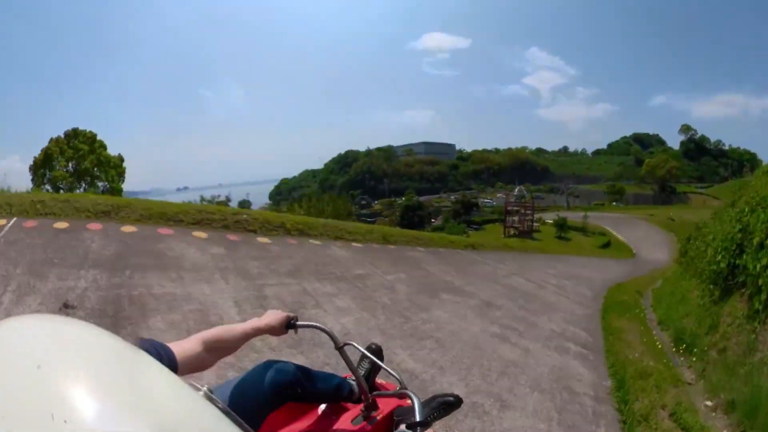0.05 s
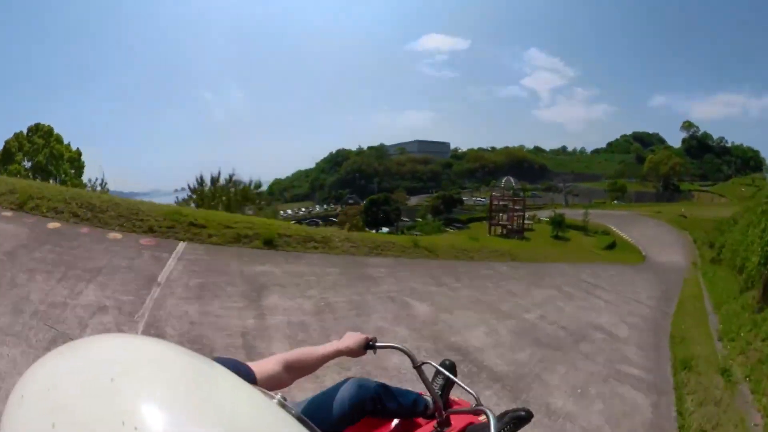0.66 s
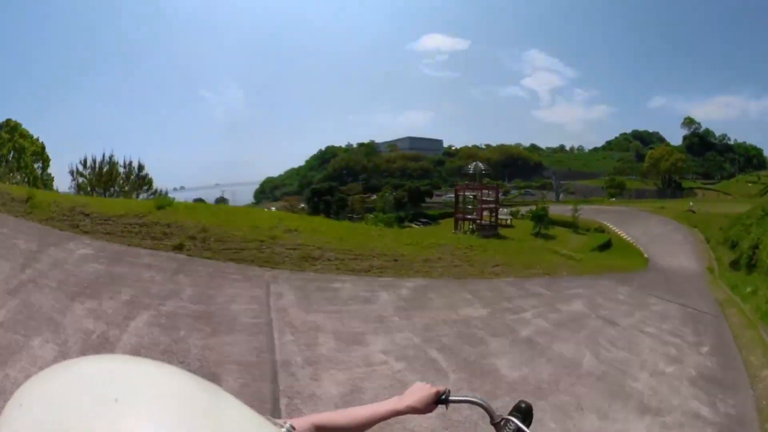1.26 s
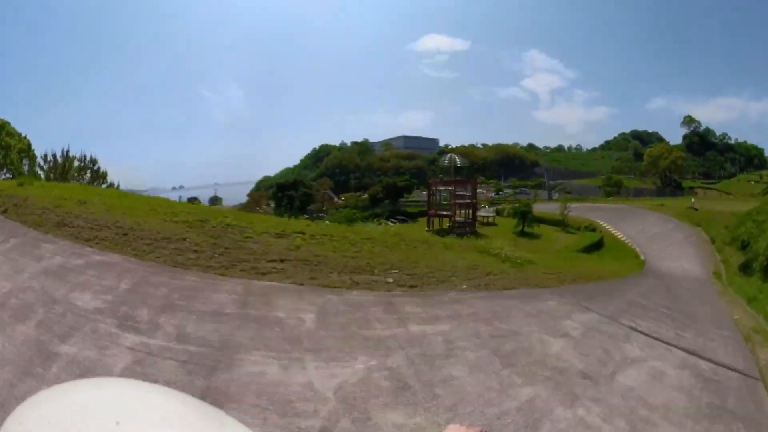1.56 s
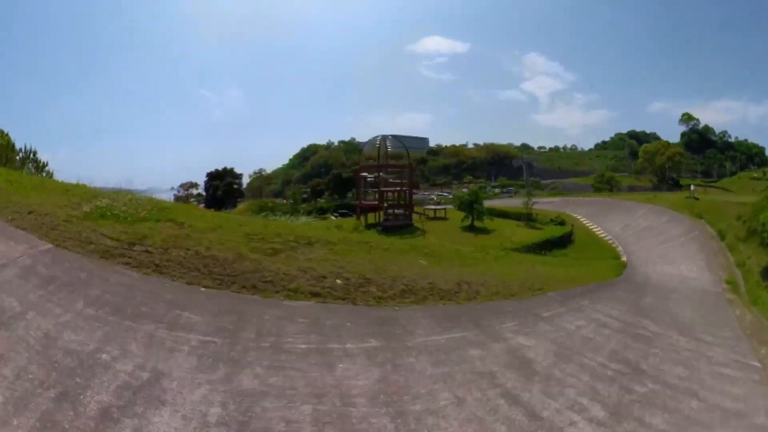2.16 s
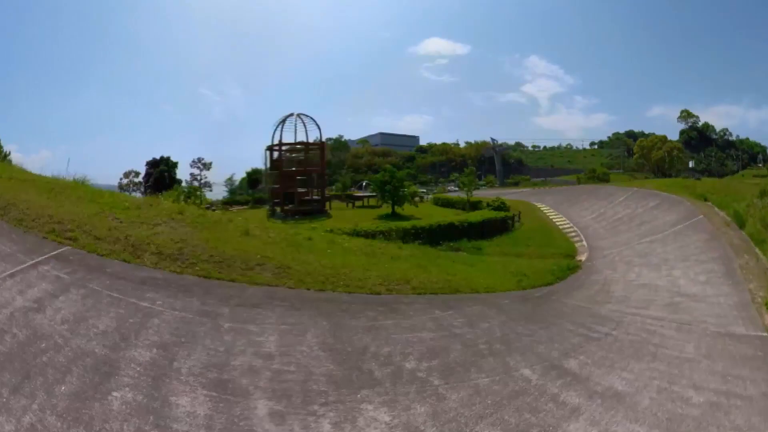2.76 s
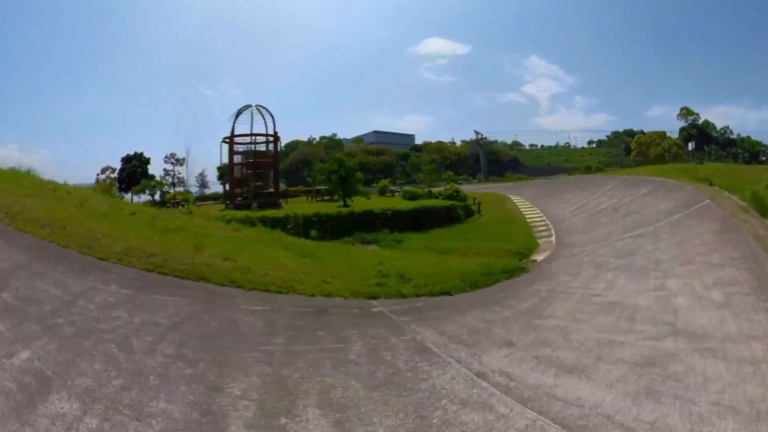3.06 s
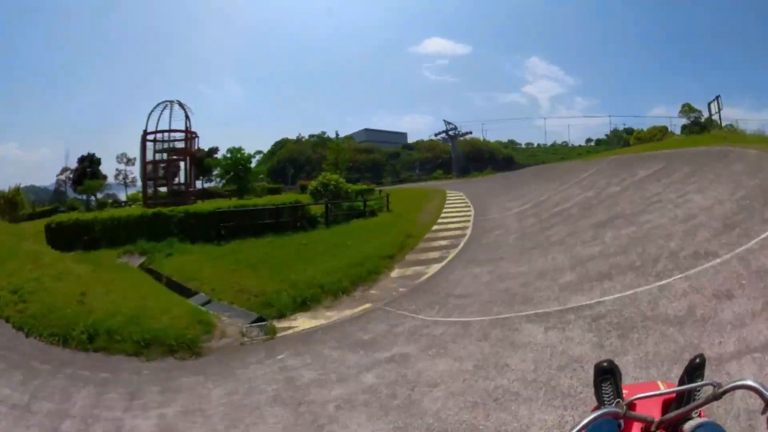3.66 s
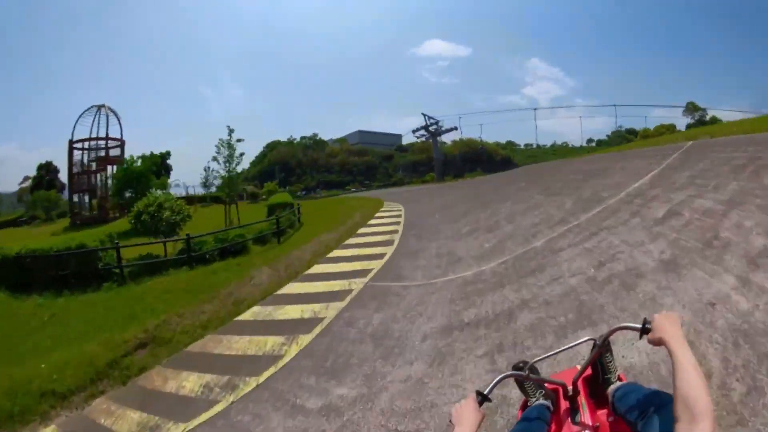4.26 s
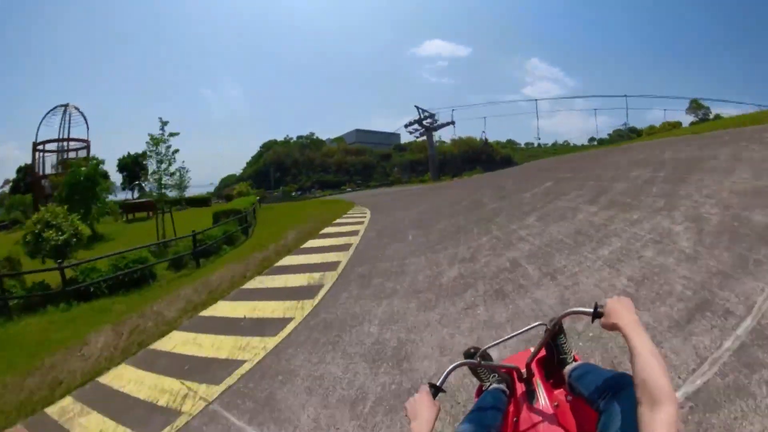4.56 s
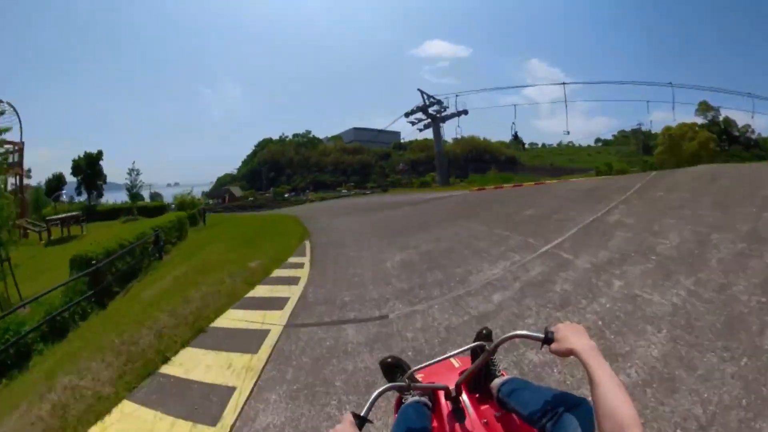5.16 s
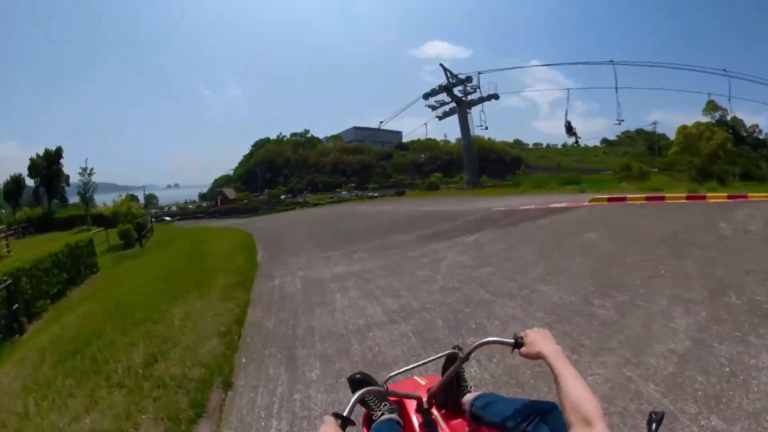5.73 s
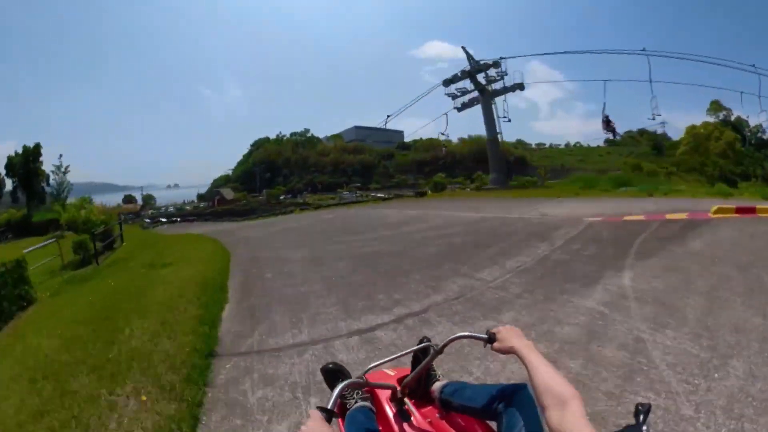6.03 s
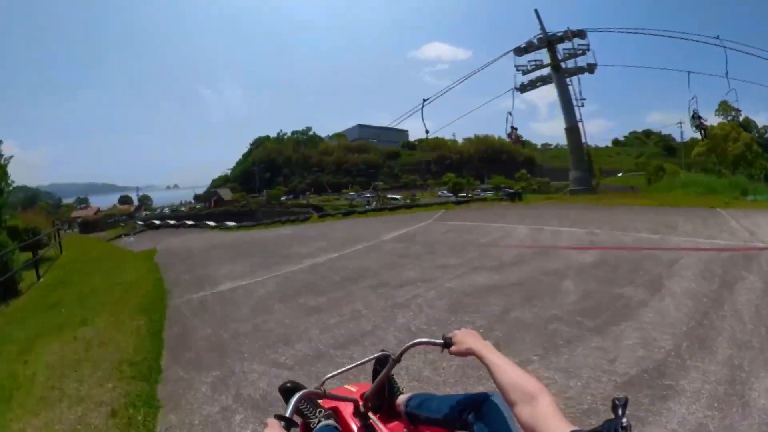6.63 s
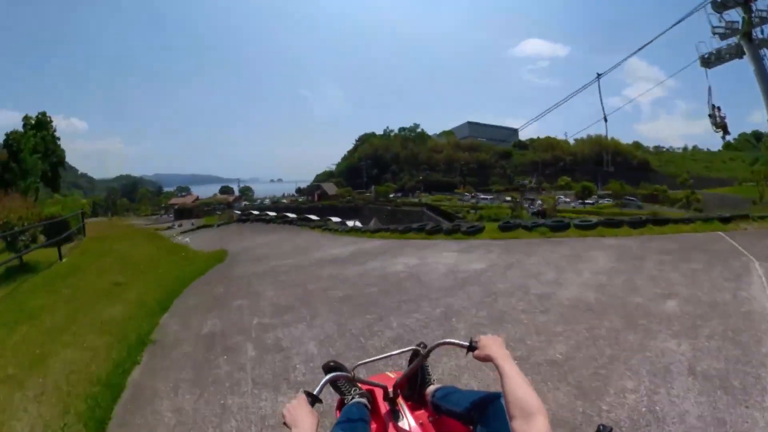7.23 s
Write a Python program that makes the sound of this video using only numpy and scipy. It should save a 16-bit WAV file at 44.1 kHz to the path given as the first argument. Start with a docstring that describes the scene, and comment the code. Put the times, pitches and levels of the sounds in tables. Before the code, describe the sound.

A small engineless cart rolls down an outdoor concrete track for about seven and a half seconds, with the microphone on board. A low, hollow boom from its body and the rumble of hard wheels dominate throughout. Joints and pits cause several uneven thuds a second, with gritty rattles, dry clacks, ticks and tiny jingles, over a faint fluttering hum from the metal frame. Low wind buffets the microphone, strongest at the start and around 2.6 seconds. The tyres swish very softly through a bend from about 3 to 3.5 seconds, then scrape briefly at 5.1 and 5.7 seconds. A wheel squeaks faintly from 6 to 6.3 seconds. From about 5.5 seconds a rubbing brake adds a very quiet, thin, high whine that grows slightly toward the end. A small rising wheel chirp comes at 7.4 seconds, with the cart still rolling.

```python
"""A small gravity cart rolls down a concrete track: its chassis booms and its hard wheels rumble.
The rough surface drives both and keeps a frame tube humming. Joints and pits thud, crush sand and
shake loose parts into rattles, clacks, ticks and jingles. The tyres swish and scrape in a bend.
Wind buffets the microphone on the cart. Near the end a wheel squeaks and a rubbing brake sings."""
import sys
import numpy as np
from scipy import signal
from scipy.fft import rfft, irfft, next_fast_len
from scipy.io import wavfile
from scipy.ndimage import uniform_filter1d, map_coordinates

SR = 44100
rng = np.random.default_rng(int(sys.argv[2]) if len(sys.argv) > 2 else 0)


def bounce(signal):
    """Save signal as a 16-bit WAV file at the path given by the first command-line argument."""
    frames = np.transpose(np.atleast_2d(signal))
    limited = np.clip(frames, -1, 1)
    pcm = np.round(limited * 32767).astype(np.int16)
    wavfile.write(sys.argv[1], SR, pcm)


N = 330309

# Table levels are relative; the functions add offsets.
# Noise spectra. Each row: frequency in Hz, density in dB.
WIND_SPECTRUM = [(8, -9), (27, -1), (70, -2), (110, -8.5), (200, -16.5), (600, -48.5)]
TICK_SPECTRUM = [(1000, -19.5), (3000, -7), (4500, 0), (6500, -3), (7800, -7.5), (9000, -19),
                 (12000, -22.5), (15000, -37.5)]
SNAP_SPECTRUM = [(600, -22), (1100, -3.5), (1600, 1.5), (2700, -4), (4200, -16), (6500, -29.5), (9000, -45)]
SWISH_SPECTRUM = [(2400, -27.5), (3000, -7), (3450, 0), (4050, -8), (5000, -11), (7000, -19), (9000, -36)]
SCRAPE_SPECTRUM = [(550, -28.5), (760, 9.5), (950, 0.5), (1190, 0), (1400, -3), (1800, -4.5), (2400, -12.5),
                   (3500, -26), (8000, -44.5), (12500, -45), (14500, -59.5)]
SAND_SPECTRUM = [(2500, -7), (4500, 4.5), (6500, -3), (8500, -11), (12500, -12.5), (15000, -24.5)]
HISS_SPECTRUM = [(600, -8), (1500, 14.5), (3200, -1.5), (4500, -1.5), (6200, -1), (8500, -15), (11500, -21),
                 (14500, -37)]
RATTLE_SPECTRUM = [(300, -18), (750, 13), (950, 10), (1250, 2.5), (1550, 2.5), (2250, -5.5), (2750, -6.5),
                   (4200, -20), (6000, -31.5), (8500, -43), (12500, -39), (15000, -55.5)]
WHEEL_SPECTRUM = [(230, -24), (320, -7), (355, 0), (388, 1.5), (420, -0.5), (495, -4), (575, -10),
                  (620, -20), (720, -21), (900, -27), (1250, -42), (2500, -63.5)]
PANEL_SPECTRUM = [(185, -27), (215, 1.5), (250, -2.5), (300, -6), (345, -12), (420, -42.5)]

# Level curves. Each row: time in seconds, level in dB.
WIND_LEVELS = [(0, -23), (.12, -34), (.25, -28.5), (.45, -33), (.8, -33.5), (1.1, -28.5), (2.05, -30),
               (2.35, -28.5), (2.6, -24), (3.1, -30.5), (3.5, -35), (4.1, -40), (4.78, -40.5),
               (4.95, -32.5), (5.5, -39), (5.85, -32.5), (6.3, -37), (7.15, -36), (7.49, -32.5)]
SWISH_LEVELS = [(2.2, -100.5), (2.7, -75), (3.1, -66), (3.45, -66), (3.9, -75.5), (4.3, -88.5)]
SCRAPE_LEVELS = [(5.07, -89), (5.12, -41), (5.15, -35.5), (5.185, -44), (5.24, -63), (5.4, -100),
                 (5.575, -58), (5.61, -41.5), (5.66, -40), (5.725, -39.5), (5.755, -59), (5.79, -100)]
PANEL_LEVELS = [(0, -40), (.13, -23), (.5, -35), (.9, -24), (1.05, -30.5), (2.7, -30.5), (3.38, -21.5),
                (4.0, -30.5), (4.13, -21.5), (4.3, -28.5), (4.82, -22), (5.2, -28.5), (5.5, -32.5),
                (5.72, -22), (5.88, -35), (6.25, -31), (6.5, -27.5), (7.49, -28)]

# Tones of a wheel and a frame tube. Each row: time in seconds, pitch in Hz, level in dB.
SQUEAK_CURVE = [(5.97, 1100, -76), (6.02, 1120, -56.5), (6.13, 1118, -57), (6.165, 1128, -62),
                (6.2, 1135, -56), (6.27, 1050, -58), (6.32, 1000, -64), (6.36, 990, -100)]
CHIRP_CURVE = [(7.41, 1112, -100), (7.445, 1135, -68), (7.465, 1170, -63), (7.49, 1225, -60)]
TUBE_CURVE = [(0, 719.4, -49), (2.4, 700, -49.5), (3.3, 700, -49), (4.0, 703.7, -53.5), (4.25, 747, -46.5),
              (4.95, 747.3, -47), (5.8, 730, -52.5), (6.15, 730.7, -62), (6.6, 725, -51.5),
              (7.49, 720, -54.5)]

# Contacts of loose parts; tyre bites. Each row: start in seconds, level in dB.
JINGLE_HITS = [(0.82, -74), (1.50, -68), (1.73, -71), (1.75, -72), (1.79, -76), (1.83, -73), (2.02, -65),
               (2.084, -59), (2.17, -69), (3.459, -69), (3.67, -65.5), (5.41, -71), (6.39, -71),
               (6.96, -72)]
TICK_HITS = [(0.267, -40.5), (0.6625, -50), (0.8259, -57), (0.9256, -54), (1.119, -49), (1.5373, -52.5),
             (2.129, -52.5), (3.003, -56), (3.136, -49), (3.32, -52), (3.524, -51), (3.5566, -50),
             (3.6565, -55), (3.762, -54), (3.901, -50.5), (3.94, -49), (4.0195, -50.5), (4.037, -51),
             (4.063, -48), (4.294, -42), (4.3759, -50), (4.692, -53), (4.7618, -43.5), (4.779, -46),
             (4.785, -42.5), (4.805, -53), (5.068, -49.5), (5.292, -48), (5.306, -53), (5.3208, -51),
             (5.402, -60), (5.555, -50.5), (5.857, -58), (5.881, -55), (6.051, -55), (6.117, -51),
             (6.185, -56.5), (6.227, -56.5), (6.383, -56), (6.444, -58)]
TYRE_BITES = [(5.195, -48.5), (5.693, -38)]

# Brake tones in Hz: upper, lower.
BRAKE_TONES_HZ = [6099, 5890]
# Brake rub. Each row: time in seconds, upper tone in dB, lower tone in dB.
BRAKE_LEVELS = [(5.3, -120, -120), (5.43, -88, -104), (5.54, -83.5, -92.5), (5.68, -95.5, -82.5),
                (5.95, -96, -84.5), (6.2, -91, -88), (6.45, -82.5, -89.5), (6.72, -88, -90),
                (6.92, -86, -80), (7.05, -81, -86), (7.2, -75.5, -83), (7.49, -74, -81)]
# Steel fitting. Each row: frequency in Hz, level in dB, T60 in seconds.
STEEL_MODES = [(9440, -7.5, 0.09), (10800, -11, .08)]
# Frame knocks. Each row: start in seconds, level in dB, pitch in Hz.
CLACK_HITS = [(0.1116, -33, 1890), (0.3217, -53, 2190), (0.362, -45, 1870), (0.5342, -43, 2010),
              (0.7058, -42, 2030), (0.9268, -45.5, 2550), (1.4247, -39, 1810), (1.499, -36, 1810),
              (1.5594, -42.5, 2900), (1.6457, -45, 2110), (1.8105, -45, 2650), (1.9076, -44, 2030),
              (1.9819, -46, 2100), (2.17, -42, 1900), (2.363, -45, 1950), (2.5576, -43, 1800),
              (2.684, -43, 1910), (2.7671, -47, 1880), (2.7816, -42, 1820), (2.926, -45, 1880),
              (3.1343, -39, 2170), (3.1812, -44, 1810), (3.316, -42, 2170), (3.3907, -41, 1970),
              (3.6054, -34, 2300), (3.665, -43, 1870), (3.7534, -43, 2540), (3.7858, -46, 1810),
              (3.848, -43, 1820), (3.8916, -40, 1850), (4.0637, -44, 2250), (4.2507, -41, 1810),
              (4.4507, -42, 1820), (4.589, -43, 1840), (4.6379, -42, 1820), (5.015, -45.5, 1850),
              (5.0664, -39, 1820), (5.5962, -41.5, 1850), (5.817, -41.5, 1900), (6.054, -40.5, 1850),
              (6.2422, -45.5, 1870), (6.3175, -41.5, 1800), (6.6109, -41, 1910), (6.7356, -49, 1890),
              (6.8548, -41, 1920), (6.8823, -42, 1910), (6.9421, -44, 2010), (7.0025, -46, 1930),
              (7.0329, -47, 2120), (7.09, -43, 1870), (7.2409, -43, 1860)]
# Ring of a knock. Each row: ratio to its pitch, level in dB, T60 in seconds.
FRAME_MODES = [(1, -17.5, .03), (1.35, -21, 0.023)]
# Ring of a tyre bite. Each row: centre in Hz, width in Hz.
TYRE_MODES = [(805, 190), (1175, 100)]
# Joints and pits. Each row: time in seconds, clatter in dB, thud in dB, boom in dB.
TRACK_BUMPS = [(0.062, -33.5, -36, -28), (0.091, -32.5, -25, -10.5), (0.109, -38, -34.5, -24),
               (0.16, -34, -19, -35), (0.174, -31.5, -36, -28), (0.19, -38, -26, -21),
               (0.225, -28, -18.5, -31), (0.255, -37, -29, -16.5), (0.319, -44, -32, -27),
               (0.357, -39, -26, -26), (0.415, -50.5, -27, -11.5), (0.471, -45, -24, -27),
               (0.516, -36.5, -27, -27.5), (0.535, -46, -31, -19), (0.634, -33.5, -30, -16),
               (0.704, -35.5, -26, -18), (0.768, -35, -24, -12.5), (0.818, -32, -25, -33),
               (0.869, -34, -25, -23), (0.913, -39, -28, -33), (0.96, -48.5, -29, -16),
               (1.081, -32, -29, -35), (1.159, -34, -23.5, -33), (1.218, -32, -26.5, -23),
               (1.366, -37.5, -40.5, -15), (1.436, -37.5, -19, -16), (1.464, -34, -27, -19.5),
               (1.501, -41, -20, -25), (1.555, -47, -29.5, -16), (1.727, -29.5, -17, -15.5),
               (1.746, -41, -29, -23), (1.782, -40, -24, -30.5), (2.003, -35.5, -19, -22.5),
               (2.071, -34, -17.5, -11), (2.129, -42, -19, -17), (2.168, -41, -18.5, -25.5),
               (2.235, -51, -32, -18.5), (2.366, -46, -26.5, -17.5), (2.413, -36, -30, -22),
               (2.505, -34, -21, -20), (2.675, -44, -22, -34), (2.734, -41, -19, -31),
               (2.778, -34.5, -24, -28.5), (2.85, -40, -25, -25), (2.879, -42.5, -20, -20),
               (2.976, -51, -20, -15.5), (3.089, -38, -36, -26), (3.157, -37, -18.5, -26),
               (3.208, -41, -20.5, -25.5), (3.316, -42, -23, -10), (3.539, -42, -23, -21.5),
               (3.606, -34, -35, -32), (3.663, -34.5, -18, -28), (3.732, -37.5, -25, -15.5),
               (3.868, -41, -25, -25), (3.905, -38, -30.5, -10.5), (3.976, -46, -26, -21),
               (4.031, -47, -18.5, -10), (4.103, -30.5, -16, -28), (4.162, -37, -28, -16.5),
               (4.192, -34.5, -33, -36), (4.226, -37, -28, -25), (4.342, -32, -23, -26),
               (4.386, -39.5, -23, -26), (4.524, -37, -31, -21), (4.593, -41.5, -25.5, -24),
               (4.77, -37, -20, -10), (4.857, -29.5, -23.5, -18), (4.901, -50, -39, -20.5),
               (4.931, -39.5, -24, -35), (5.01, -39, -22.5, -23), (5.082, -33.5, -31, -23),
               (5.129, -38, -27.5, -19), (5.146, -41, -20.5, -24), (5.305, -34.5, -28.5, -10),
               (5.387, -31, -24.5, -31), (5.557, -32, -25.5, -32), (5.609, -43, -21.5, -29.5),
               (5.643, -37, -24, -14), (5.709, -38.5, -23, -25.5), (5.836, -46, -28.5, -26.5),
               (6.034, -41, -28.5, -24), (6.268, -46.5, -31, -13), (6.388, -32, -22.5, -18),
               (6.416, -33.5, -31, -11.5), (6.469, -41, -21.5, -26), (6.506, -36, -21.5, -22),
               (6.57, -49, -30.5, -16), (6.629, -39, -24, -20), (6.683, -50, -26.5, -26.5),
               (6.725, -45, -30.5, -31), (6.882, -38.5, -32.5, -19.5), (6.935, -45, -29, -17),
               (7.003, -45, -30, -26.5), (7.085, -47.5, -26, -19), (7.241, -39.5, -27, -25.5)]
# Grit under the tread. Each row: time in seconds, rattle in dB, hiss in dB.
GRIT_LEVELS = [(0, -58.5, -79), (.18, -55, -74), (.42, -58.5, -76.5), (.8, -57.5, -71.5), (1.2, -56, -71.5),
               (2.05, -58.5, -70.5), (2.25, -60, -70.5), (2.6, -57.5, -68.5), (3.4, -59, -70.5),
               (4.3, -57, -76), (4.85, -56.5, -70.5), (5.0, -60, -77), (5.45, -60, -81), (5.85, -61.5, -76),
               (6.15, -62, -74), (6.5, -57.5, -76), (6.78, -60.5, -80), (7.49, -60, -74)]
# Shaking by the track. Each row: time in seconds, boom in dB, rumble in dB.
RIDE_LEVELS = [(0, -20.5, -28.5), (.35, -24, -30.5), (.8, -19.5, -28), (1.2, -25, -27), (1.6, -19.5, -28.5),
               (1.9, -22.5, -30), (2.1, -22.5, -26.5), (2.8, -22, -25.5), (3.3, -21, -25),
               (3.95, -16.5, -27), (4.45, -19.5, -29.5), (5.15, -17, -27), (5.45, -19, -29),
               (5.75, -22, -26), (6.1, -18.5, -27.5), (6.5, -21.5, -29), (6.8, -19, -29),
               (7.49, -20, -28.5)]
# Brief dips of the boom. Each row: centre in seconds, half length in seconds, depth in dB.
BOOM_LULLS = [(0.155, .022, 8), (0.27, 0.034, 6), (0.464, 0.017, 5.5), (0.583, .018, -2),
              (1.005, 0.018, 10), (1.058, 0.03, 8), (1.374, 0.03, 19), (1.658, .012, 6), (1.842, 0.01, 16),
              (1.95, .04, 3), (2.19, 0.017, 8), (2.287, 0.016, 10), (2.433, .016, 5), (2.682, 0.025, 7.5),
              (2.76, 0.033, 4), (4.096, 0.021, 12), (4.21, 0.024, 16), (4.378, 0.014, 8.5),
              (4.818, 0.017, 14), (4.97, 0.035, 15), (5.034, 0.023, 8), (5.262, 0.02, 11),
              (5.357, 0.026, 17), (5.456, 0.023, 17), (5.935, 0.02, 6.5), (6.05, 0.031, 8.5),
              (6.196, 0.012, -2), (6.76, 0.053, 9.5), (6.857, .016, 7), (7.002, 0.013, 7.5),
              (7.234, 0.012, 4.5)]
# Chassis resonance. Each row: centre in Hz, width in Hz, level in dB.
CHASSIS_MODES = [(166.65, 28.3, -0.5)]


def amp(db):
    return 10 ** (np.asarray(db) / 20)


def unit(x):
    """x at rms 1."""
    return x / np.sqrt(np.mean(x ** 2) + 1e-20)


def curves(rows):
    """One value per sample for each column after the time."""
    times_s, *columns = np.transpose(rows)
    return [np.interp(np.arange(N) / SR, times_s, column) for column in columns]


def wobble(rate_hz):
    """Smooth random curve, rate_hz knots a second."""
    knots = rng.standard_normal(int(N * rate_hz / SR) + 4)
    return map_coordinates(knots, [np.arange(N) * rate_hz / SR])


def filtered(x, response):
    """x through the gain response(hz)."""
    size = next_fast_len(len(x) + 8192)
    return irfft(rfft(x, size) * response(np.fft.rfftfreq(size, 1 / SR)), size)[:len(x)]


def coloured(x, spectrum):
    """x shaped by a spectrum, at rms 1."""
    knots_hz, db = np.transpose(spectrum)
    gain = lambda hz: amp(np.interp(np.log(hz + 1), np.log(knots_hz), db, left=-120, right=-120))
    return unit(filtered(x, gain))


def noise(spectrum):
    return coloured(rng.standard_normal(N), spectrum)


def resonance(hz, centre_hz, width_hz):
    """Response of two equal band-passes in series."""
    return (1j * hz * width_hz / (centre_hz ** 2 - hz ** 2 + 1j * hz * width_hz)) ** 2


def steadied(x, span_s):
    """x with swells slower than span_s evened out, at rms 1."""
    power = signal.fftconvolve(x ** 2, signal.windows.hann(int(span_s * SR) + 3), "same")
    return unit(x / np.sqrt(np.abs(power) + 1e-9))


def strikes(starts_s, levels_db, attack_s, t60_s):
    """Summed envelope of blows that rise and decay."""
    t = np.arange(SR // 4) / SR
    shape = (1 - np.exp(-t / attack_s)) * amp(-60 * t / t60_s)
    blows = np.bincount(np.round(np.asarray(starts_s) * SR).astype(int), amp(levels_db), N)[:N]
    return signal.fftconvolve(blows, shape / shape.max())[:N]


def patchy(x, spread_db):
    """Each knock rings different parts: random peaks a few hundred Hz wide, some 30 ms long."""
    frames = signal.stft(x, nperseg=512)[2]
    peaks = uniform_filter1d(rng.standard_normal(frames.shape), size=3, axis=0)
    peaks = uniform_filter1d(peaks, size=6, axis=1)
    return unit(signal.istft(frames * amp(spread_db * unit(peaks)), nperseg=512)[1][:N])


def friction_tone(hz, waver):
    """Sine of wavering pitch, at rms 1."""
    return unit(np.sin(2 * np.pi * np.cumsum(hz * (1 + waver * wobble(83))) / SR))


def lull_db():
    """Summed depth of the bell-shaped lulls; negative lifts the level."""
    t = np.arange(N) / SR
    return sum(db * np.exp(-((t - centre_s) / half_s) ** 2) for centre_s, half_s, db in BOOM_LULLS)


def wind():
    """Air tumbles over the microphone in low lumps."""
    level_db = curves(WIND_LEVELS)[0] + 0.5 + 0.93 * wobble(7.4)
    return amp(level_db) * steadied(noise(WIND_SPECTRUM) * amp(2 * wobble(16)), span_s=0.32)


def brake():
    """A rubbing brake flips between two thin tones, ending mainly on the upper."""
    return sum(amp(db + 1.5 * wobble(16)) * friction_tone(hz, waver=0.0015)
               for hz, db in zip(BRAKE_TONES_HZ, curves(BRAKE_LEVELS)))


def chirp():
    """A wheel chirps roughly upwards on its second and third partials."""
    hz, db = curves(CHIRP_CURVE)
    partials = friction_tone(2 * hz, waver=0.012) + 0.35 * friction_tone(3 * hz, waver=0.012)
    return amp(db) * partials * unit(amp(4 * wobble(240)))


def squeak():
    """A wheel squeaks faintly on one friction tone."""
    hz, db = curves(SQUEAK_CURVE)
    return amp(db + 2.5 * wobble(45)) * friction_tone(hz, waver=0.011)


def jingle():
    """A small steel fitting shivers throughout and chatters on its seat when jolted."""
    starts_s, db = np.transpose(JINGLE_HITS)
    shiver = amp(-81.5 + 3.9 * wobble(45))
    t = np.arange(N) / SR
    sound = np.zeros(N)
    for hz, mode_db, t60_s in STEEL_MODES:
        chatter = strikes(starts_s, db - 3.5, attack_s=0.006, t60_s=t60_s)
        ring = np.sin(2 * np.pi * hz * t + 1.6 * wobble(260)) * unit(amp(4 * wobble(110)))
        sound += amp(mode_db) * (shiver + chatter) * ring
    return sound


def ticks():
    """Loose parts click: a few loud contacts among faint ones that follow the tread's hiss level."""
    starts_s, db = np.transpose(TICK_HITS)
    loud = strikes(starts_s + 0.0005, db - 5.5, attack_s=0.0004, t60_s=0.008)
    when, size = rng.random((420, 2)).T
    hiss_db = curves(GRIT_LEVELS)[1][(when * (N - 1)).astype(int)]
    faint = strikes(when * (N - 1) / SR, hiss_db - 2.5 + 12 * size, attack_s=0.0003, t60_s=0.0039)
    return (loud + faint) * steadied(noise(TICK_SPECTRUM), span_s=0.0018)


def clacks():
    """Loose frame parts knock: a dry snap and a brief ring, each at its own pitch."""
    starts_s, levels_db, _ = np.transpose(CLACK_HITS)
    snap = strikes(starts_s, levels_db - 11.5, attack_s=0.002, t60_s=0.03)
    snap *= steadied(noise(SNAP_SPECTRUM), span_s=0.008)
    t = np.arange(SR // 10) / SR
    rise = 1 - np.exp(-t / 0.00088)
    ring = np.zeros(N + len(t))
    for start_s, db, hz in CLACK_HITS:
        for ratio, mode_db, t60_s in FRAME_MODES:
            phase = 2 * np.pi * hz * ratio * t + 0.072 * np.cumsum(rng.standard_normal(len(t)))
            envelope = amp(db + mode_db + 7 - 60 * t / t60_s) * rise
            ring[int(start_s * SR):][:len(t)] += envelope * np.sin(phase)
    return snap + ring[:N]


def tyres():
    """Rubber swishes round the banking, then scrapes sideways twice, each time with a ringing bite."""
    swish = amp(curves(SWISH_LEVELS)[0]) * noise(SWISH_SPECTRUM)
    scrape = amp(curves(SCRAPE_LEVELS)[0]) * unit(noise(SCRAPE_SPECTRUM) * amp(1.8 * wobble(170)))
    modes = lambda hz: sum(resonance(hz, *mode) for mode in TYRE_MODES)
    ring = steadied(filtered(rng.standard_normal(N), modes), span_s=0.018)
    starts_s, db = np.transpose(TYRE_BITES)
    return swish + scrape + strikes(starts_s, db, attack_s=0.036, t60_s=0.11) * ring


def tube():
    """The track rings a frame tube in one narrow, fluttering mode, higher in the tight of the bend."""
    hz, db = curves(TUBE_CURVE)
    phase = 2 * np.pi * np.cumsum(hz) / SR
    return amp(db) * unit(wobble(100) * np.sin(phase) + wobble(100) * np.cos(phase))


def grit(contacts_per_s=6000):
    """Tiny hard contacts, at rms 1."""
    contacts = rng.standard_normal(N) * amp(3 * rng.exponential(size=N))
    contacts *= rng.random(N) < contacts_per_s / SR
    return patchy(coloured(np.clip(contacts, -12, 12), RATTLE_SPECTRUM), spread_db=2)


def bumps(grains_per_s=900):
    """Joints and pits shake the frame, crush sand in sharp grains and thud through the wheels."""
    times_s, clatter_db, thud_db, _ = np.transpose(TRACK_BUMPS)
    clatter = strikes(times_s - 0.001, clatter_db - 7.8, attack_s=0.01, t60_s=0.04)
    clatter *= steadied(grit() * amp(3 * wobble(300)), span_s=0.03)
    sand = coloured(rng.standard_normal(N) * (rng.random(N) < grains_per_s / SR), SAND_SPECTRUM)
    crunch = strikes(times_s - 0.002, clatter_db - 35, attack_s=0.012, t60_s=0.11) * sand
    thud = strikes(times_s - 0.001, thud_db - 2, attack_s=0.0056, t60_s=0.066)
    thud *= steadied(noise(WHEEL_SPECTRUM), span_s=0.031)
    return clatter + crunch + thud


def wheels():
    """Hard wheels rumble; small jolts set off gritty rattles; sand hisses under the tread."""
    dip_db = lull_db()
    rumble_db = curves(RIDE_LEVELS)[1] - 0.38 * dip_db
    rattle_db, hiss_db = curves(GRIT_LEVELS) - 0.1 * dip_db
    when, size = rng.random((420, 2)).T
    pebbles = strikes(when * (N - 1) / SR, 7 * size, attack_s=0.005, t60_s=0.038)
    pebbles = np.tanh(0.6 * unit(pebbles))  # the tread cushions the hardest hits
    jolt = 0.6 * wobble(60) + 0.55 * wobble(130)
    roughness = np.tanh(wobble(20))  # rougher and smoother stretches of concrete
    rumble = patchy(noise(WHEEL_SPECTRUM), spread_db=1.85)
    rumble = steadied(rumble * amp(0.52 * jolt) * (1 + 0.55 * pebbles), span_s=0.071)
    rattle = steadied(grit() * amp(4.3 * jolt) * (0.87 + pebbles), span_s=0.16)
    hiss = patchy(noise(HISS_SPECTRUM) * amp(2 * jolt + 1.9 * wobble(330)), spread_db=2.5)
    return (amp(rumble_db - 0.7 + roughness) * rumble
            + amp(rattle_db + 7 + 1.2 * roughness) * rattle
            + amp(hiss_db + 7 + 2 * roughness) * hiss)


def chassis():
    """Rough concrete rings the low chassis mode, bumps swell it, and body panels drone above it."""
    modes = lambda hz: sum(amp(db) * resonance(hz, centre_hz, width_hz)
                           for centre_hz, width_hz, db in CHASSIS_MODES)
    ring = steadied(filtered(rng.standard_normal(N), modes), span_s=0.078)
    panels = steadied(noise(PANEL_SPECTRUM), span_s=0.96)
    times_s, _, _, boom_db = np.transpose(TRACK_BUMPS)
    swell = steadied(amp(2.5 * wobble(22)), span_s=0.23)
    rolling = amp(curves(RIDE_LEVELS)[0] - 0.52 - lull_db()) * swell
    kicks = strikes(times_s - 0.016, boom_db - 6.5, attack_s=0.042, t60_s=0.15)
    panel_db = curves(PANEL_LEVELS)[0] - 2 + 1.4 * wobble(9.7)
    return np.hypot(rolling, kicks) * ring + amp(panel_db) * panels


def scene():
    """Mono sum of all sources."""
    rolling = chassis() + wheels() + tube() + tyres() + bumps()
    loose_parts = clacks() + ticks() + jingle()
    squeals = brake() + chirp() + squeak()
    return (rolling + loose_parts + squeals + wind())[None]


def record(dry):
    """Click-free fades at both ends, then a steep low-pass."""
    fade_s, cutoff_hz = 0.006, 15700
    t = np.arange(N) / SR
    fade = np.minimum(1, np.minimum(t, t[::-1]) / fade_s)
    return np.array([filtered(x * fade, lambda hz: 1 / (1 + (hz / cutoff_hz) ** 60)) for x in dry])


dry = scene()
out = record(dry)
bounce(out)
```